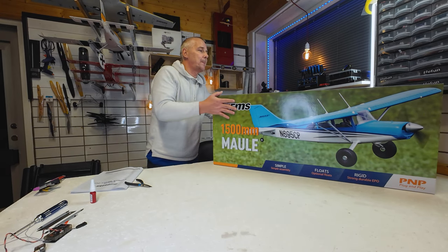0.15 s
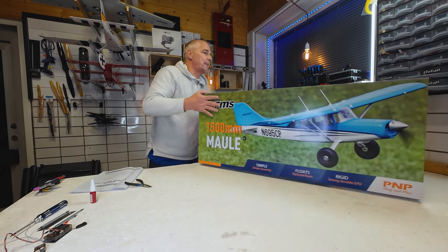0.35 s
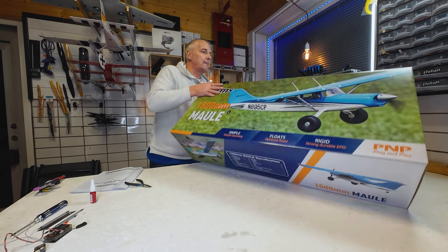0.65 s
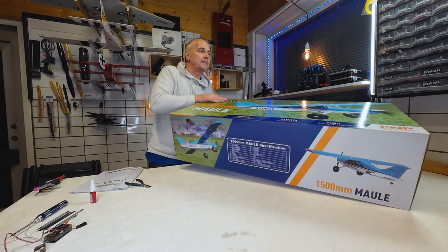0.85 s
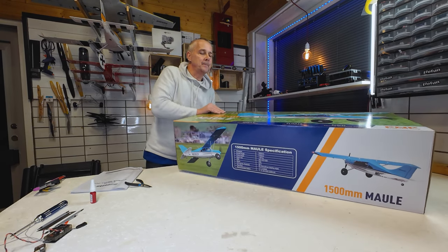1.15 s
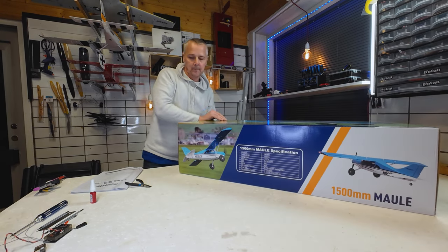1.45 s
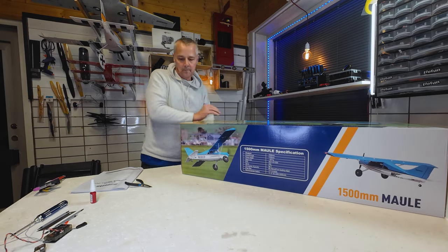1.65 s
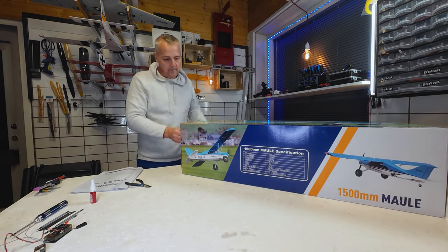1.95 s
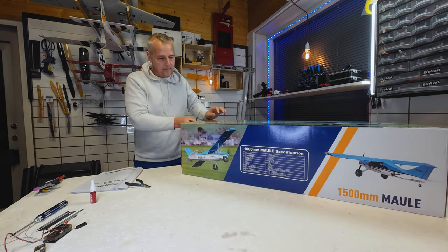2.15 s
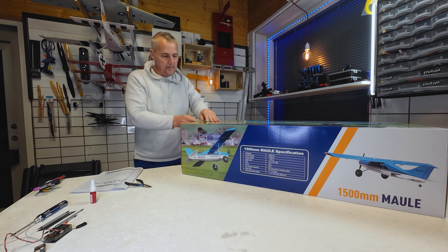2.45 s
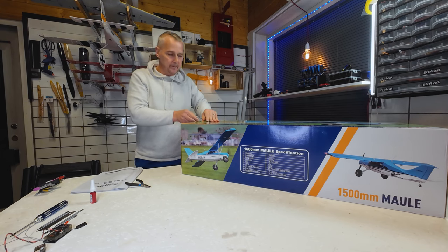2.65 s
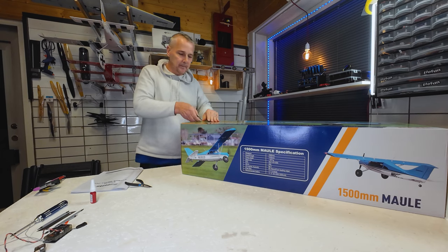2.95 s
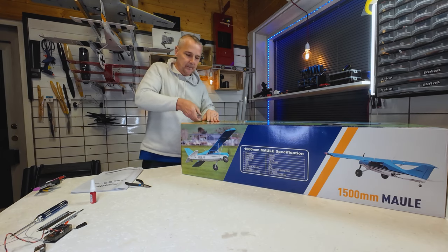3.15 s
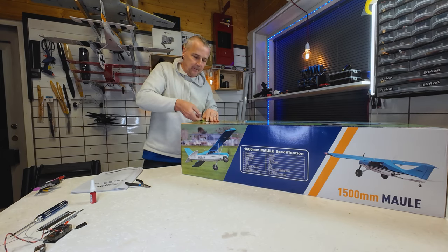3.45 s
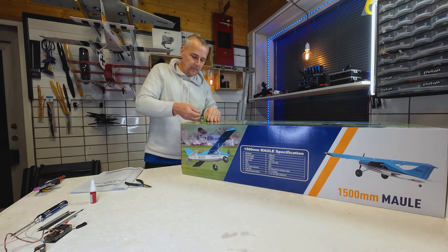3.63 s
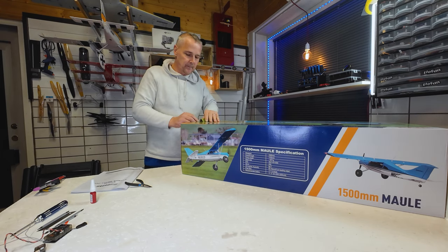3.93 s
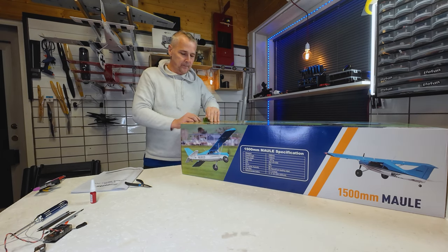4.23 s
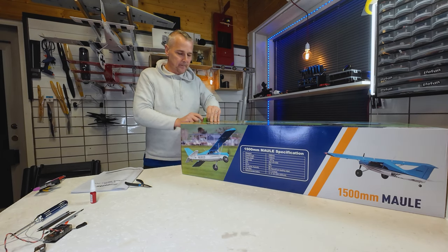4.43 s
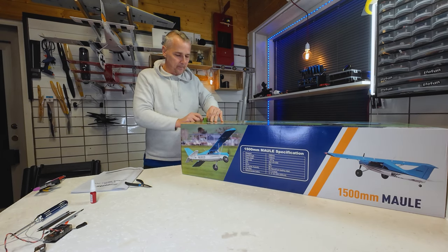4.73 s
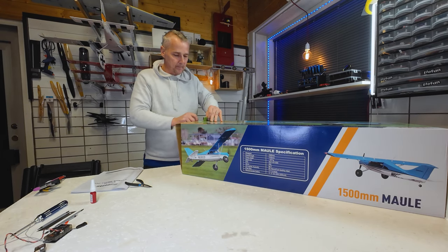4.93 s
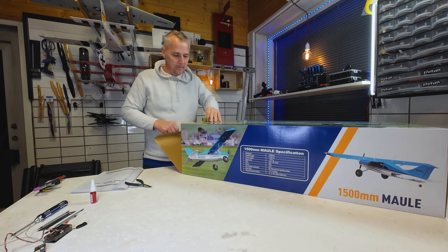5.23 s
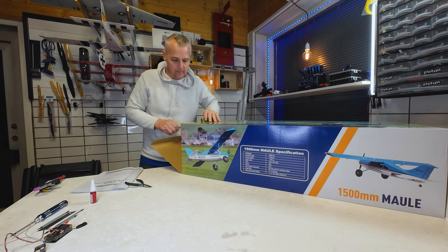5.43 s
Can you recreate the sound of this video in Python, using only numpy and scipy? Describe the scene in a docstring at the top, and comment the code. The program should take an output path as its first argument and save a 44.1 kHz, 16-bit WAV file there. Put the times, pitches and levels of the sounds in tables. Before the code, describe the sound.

A large, hollow cardboard box is handled on a bench in a small workshop, heard close in stereo with short dense echoes and faint low room noise. A dull low thump opens the scene. At about 0.4 s a brief rising squeak leads into a loud, gritty scrape, which judders in low bumps until about 0.8 s. Light knocks and faint sliding follow, with small crackles near 1.3 s. At 1.45 s the box drops flat with a huge, deep boom, the loudest event, ringing briefly. From 2.1 s fingers tap and pick softly at the board. A rub from 3.4 s ends in a crisp, hard pop at 3.6 s. Quiet ticks continue around 3.9 to 4.2 s; a short low groan and cracks come at 4.45 to 4.7 s, strongest at the end. Dry, raspy rubbing peaks at 5 s, then weaker scuffs at 5.25 and 5.5 s.

```python
"""A long cardboard box is tipped over on a workbench, dragged round and dropped flat: decaying sines give
its panel flexes, low resonances its hollow air, and random grains its friction and breaking fibres.
Fingers then pick at the end flap, which ticks, pops free, groans by stick-slip and rubs open.
A small workshop answers with dense decaying echoes over a quiet noise, heard by two close microphones."""
import sys
import numpy as np
from scipy import signal
from scipy.fft import rfft, irfft
from scipy.io import wavfile
from scipy.ndimage import uniform_filter1d, minimum_filter1d

SR = 44100
rng = np.random.default_rng(int(sys.argv[2]) if len(sys.argv) > 2 else 0)


def materialize(psi):
    """Save the field psi as 16-bit PCM at rate SR to the path in sys.argv[1].

    A 1-D psi becomes a single channel; in a 2-D psi each row is a channel.
    """
    bounded = np.clip(np.atleast_2d(psi).T, -1, 1)
    quanta = np.round(bounded * 32767).astype(np.int16)
    wavfile.write(sys.argv[1], SR, quanta)


N = 246078
TIME = np.arange(N) / SR
FREQS = np.fft.rfftfreq(N, 1 / SR)

# Steady room noise. Each row: frequency in Hz, relative spectrum level in dB.
QUIET_COLOUR = [(30, 7), (100, -4.5), (160, -16.5), (400, -23.5), (1000, -30), (3000, -31.5), (7000, -42),
                (15000, -40)]
QUIET_DB = -56
# Slow sway of the long panels. Each row: time in seconds, level in dB.
SWAY_LEVELS = [(0, -27), (0.2, -32), (1.7, -43), (2.1, -52), (3.55, -54.5), (3.7, -34), (5.2, -54.5)]
SWAY_HZ = 17

# Heavy blows and soft pushes that flex a panel. Each row: start in seconds, peak in dB, flex rate in Hz,
# swell time in seconds.
PANEL_FLEXES = [(0.011, -16, 166, 0.0031), (0.028, -7, 223, 0.0063), (0.058, -15.5, 86.5, 0.0075),
                (1.429, -15.5, 73, 0.0038), (1.455, -0.5, 39.4, 0.016), (1.467, -3, 113, 0.0042),
                (1.497, -9, 88, 0.0045), (1.571, -26.5, 85.2, 0.014), (1.699, -44, 91.3, 0.036),
                (2.082, -31, 122.6, 0.016), (2.487, -46, 97.5, 0.019), (2.726, -31.5, 237, 0.011),
                (2.755, -38.5, 89.8, 0.027), (3.305, -54, 100, 0.058), (3.594, -28, 110, .0089),
                (3.641, -30, 81, 0.0091), (4.15, -53.5, 101, 0.018), (4.746, -35, 100, .015),
                (5.037, -33, 94, 0.019), (5.278, -43, 100.3, 0.044)]
# The scraping box judders in a row of bumps that swell, fade and sink in pitch.
JUDDER_START_S, JUDDER_GAP_S, JUDDER_SWELL_S = 0.492, 0.057, 0.0065
JUDDER_DB, JUDDER_PEAK_S, JUDDER_WIDTH_S = -17.5, 0.61, 0.12
JUDDER_HZ, JUDDER_SAG_HZ_PER_S, JUDDER_SCATTER = 128, 180, 0.06
# Air in the box and its big panels. Each row: frequency in Hz, level in dB, 60 dB decay time in seconds.
BOX_RESONANCES = [(42, 2, .25), (86, 3.5, 0.33), (102, -2.5, .48), (140, -16, .34)]

# Decay of the workshop echoes. Each row: frequency in Hz, 60 dB decay time in seconds.
ROOM_DECAY = [(100, 0.18), (400, 0.28), (2800, 0.33), (6000, 0.26), (13000, 0.2)]
# Left-right correlation of echoes and room noise. Each row: frequency in Hz, correlation from 0 to 1.
STEREO_LIKENESS = [(60, 1), (160, 0.97), (500, 0.97), (1500, 0.94), (4000, 1), (8000, 0.05), (14000, 0.021)]
# Spectrum of the echoes. Each row: frequency in Hz, gain in dB.
ECHO_COLOUR = [(3000, 0.0024), (12000, -3)]

# Box sliding on the bench. Each row: time in seconds, stroke level in dB, brightness in dB per weight.
SLIDE_MOTION = [(0.019, -53.5, -5), (0.15, -49.5, 3.9), (0.32, -46, 2.5), (0.4, -35, 1.5),
                (0.452, -16.5, 2.5), (0.49, -22, 3.5), (0.54, -19, -3.5), (0.61, -27.5, -7),
                (0.662, -32, 3.6), (0.754, -37.5, 1.5), (0.815, -58.5, -1), (0.96, -58, 6),
                (1.02, -55.5, -2), (1.1, -48, 0.8), (1.39, -52, 0.4), (1.45, -39.5, -1.9),
                (1.639, -52.5, -1.5), (1.831, -68, 4.5)]
# The sliding edge rings higher as it gets brighter.
SLIDE_RING_HZ, SLIDE_RING_OCTAVES_PER_TILT = 2700, 0.21
# Spectrum of the dragging grains. Each row: frequency in Hz, relative level in dB.
DRAG_SPECTRUM = [(59, -28), (100, -6.5), (193, -8.5), (289, -9), (442, -12.5), (736, -16), (1330, -21),
                 (1580, -20.5), (3620, -21.5), (6200, -28.5), (8500, -29.5), (13500, -33), (16000, -40.5)]
# Body, rasp and hiss of the slide. Each row: brightness weight relative to the rasp, level at a
# moderate stroke in dB, rise in dB per dB of stroke.
SLIDE_LAYERS = [(-1, -41.5, .55), (0, -45, 1), (1, -50, 0.9638)]
# Limits of the body, rasp and hiss bands, in Hz.
FRICTION_EDGES = [85, 700, 5500, 16500]
# Panel rumble under friction: level at a moderate stroke in dB, rise in dB per dB of stroke; band in Hz.
SLIDE_RUMBLE, RUB_RUMBLE, RUMBLE_HZ = (-56.5, 1), (-52, 1), (82, 135)
MODERATE_DB = -45

# Knocks, pops and ticks of the board. Each row: time in seconds, strength in dB, brightness in dB
# per weight, crumpling time in seconds, ring in Hz.
BOARD_SNAPS = [(0.032, -34.5, -2.5, 0.0085, 2480), (0.466, -38, -2.5, 0.0048, 2400),
               (0.525, -39, -11, 0.011, 3500), (0.88, -52, -4.5, 0.0097, 2600),
               (0.917, -47.5, -4, 0.0023, 2740), (1.024, -44.5, -9.5, 0.0068, 3200),
               (1.274, -41, -2, 0.028, 2630), (1.306, -42.5, -1, 0.01, 2400), (1.427, -34, -3, 0.01, 1760),
               (1.462, -36.5, -11.5, 0.0083, 1750), (1.924, -74, -1.5, 0.0013, 2590),
               (2.081, -43.5, -4, 0.015, 2900), (2.105, -46.5, -3, 0.019, 2910),
               (2.468, -55.5, -2.5, 0.007, 2850), (2.596, -51.5, -5, 0.0096, 2880),
               (2.725, -45.5, -2, 0.011, 2860), (2.773, -47.5, -5, 0.016, 2500),
               (3.07, -65, -3, 0.0067, 2790), (3.125, -72.5, -0.5, .0016, 2800),
               (3.235, -57, -3, 0.0075, 2820), (3.293, -46, 0, 0.0035, 1500),
               (3.301, -43.5, 2.17, 0.0021, 1900), (3.416, -63.5, 2, .0069, 2400),
               (3.568, -26, -1.73, 0.011, 2800), (3.58, -29.5, -0.5, 0.0024, 2800),
               (3.603, -28, -1.5, 0.0031, 2850), (3.884, -61.5, -3, 0.0052, 2950),
               (3.946, -48, -4, 0.009, 2880), (4.019, -52.5, 0.63, 0.0084, 2780),
               (4.114, -50.5, 3.5, 0.0029, 5100), (4.151, -43.5, 1.3, 0.0041, 1570),
               (4.425, -53.5, -6, 0.0036, 3400), (4.442, -49, -5.5, 0.0083, 3520),
               (4.576, -38.5, -5.5, 0.0041, 3300), (4.646, -43, -8, 0.0047, 2700),
               (4.715, -31.5, -4, 0.0055, 2220), (4.993, -47, 1.5, 0.0089, 3860),
               (5.011, -45.5, -2, .0057, 3800), (5.226, -55, -2.4, .005, 3500),
               (5.245, -58, -3.5, 0.018, 2075), (5.505, -43.5, -0.53, 0.021, 1618)]
# Hollow, knock, crack and tick of a snap. Each row: brightness weight, level at a moderate snap in dB,
# rise in dB per dB of snap.
SNAP_LAYERS = [(-0.86, -46.5, 0.97), (1, -43, 1.0961), (3.19, -43, 1.1249), (4.5, -45, 0.93)]
# Limits of the hollow, knock, crack and tick bands, in Hz.
SNAP_LIMITS = [130, 350, 1200, 5000, 16500]
# Resonances of the board. Each row: frequency in Hz, width in Hz, level in dB.
BOARD_RESONANCES = [(305, 76, -2), (495, 140, 2.5), (746, 100, -1.5), (933, 30, -22.5), (1621, 330, -9),
                    (2320, 550, -10), (2480, 1200, 3.5), (3400, 150, -9.5), (5800, 300, -37.5)]
BRITTLENESS = 4
BOX_LANDED_S = 1.85  # earlier snaps belong to the box, later ones to the fingers

# Stick-slip of an edge on the bench. Each row: time in seconds, pitch in Hz, level in dB.
SQUEAK_PATH = [(0.395, 612, -40.5), (0.412, 700.3, -32.5), (0.44, 751, -21.5), (0.468, 912, -25),
               (0.5, 850, -35.5)]
SQUEAK_HARMONICS_DB = [2.5, -21.5, -1.5, -14.5, -11]  # from the fundamental up
# The flap groaning in its slot. Each row: time in seconds, pitch in Hz, level in dB.
GROAN_PATH = [(4.445, 320, -55), (4.47, 295.2, -46), (4.52, 252.7, -47), (4.565, 270.8, -64),
              (4.58, 304.2, -32.5), (4.62, 280, -37), (4.65, 289.7, -34.5), (4.68, 412, -37),
              (4.715, 400, -38)]
GROAN_HARMONICS_DB = [-1.5, -11, -19.5, -43]  # from the fundamental up

# Strokes of fingers and flap on the board. Each row: start in seconds, swell in seconds, release in
# seconds, stroke level in dB, brightness in dB per weight, ring in Hz.
RUB_STROKES = [(2.373, 0.038, 0.07, -58.5, 2, 2900), (2.584, 0.024, 0.066, -58, -2.5, 2900),
               (3.4, 0.076, 0.022, -36.5, 1, 2850), (3.83, 0.074, 0.098, -71, -4.5, 3500),
               (3.94, 0.11, 0.02, -59.5, -1.5, 3500), (4.249, 0.07, 0.037, -57, -1, 2900),
               (4.44, 0.054, 0.013, -50, -1, 3900), (4.55, .14, 0.018, -51.5, -3, 2300),
               (4.862, 0.025, 0.046, -40, 1.5, 2500), (4.933, 0.073, 0.0083, -32.5, 1, 3900),
               (5.208, 0.064, 0.035, -48, 0, 2300), (5.453, 0.065, 0.049, -44.5, -0.5, 1700)]
RUB_SWELL_POWER = 0.94
# Spectrum of the rubbing grains. Each row: frequency in Hz, relative level in dB.
RUB_SPECTRUM = [(100, 4), (300, 6.5), (700, 7), (1200, -4.5), (1700, -0.5), (3900, -4), (7000, -13),
                (14000, -14.5)]
# Body, rasp and hiss of a rub. Each row: brightness weight relative to the rasp, level at a
# moderate stroke in dB, rise in dB per dB of stroke.
RUB_LAYERS = [(-4.5, -52, 0.66), (-0.5, -46.5, 1), (1, -54.5, .8)]

# Response of the microphones and their ports. Each row: frequency in Hz, gain in dB.
MICROPHONE_RESPONSE = [(4500, -3.0), (6200, -3), (7200, -6), (10000, -0.5), (12200, -5.0),
                       (13500, 5.5), (16000, -1.5)]
EDGE_HZ = 16000


def gain_of(db):
    """Logarithmic level: decibels become an amplitude ratio."""
    return 10 ** (np.asarray(db) / 20)


def evened(x):
    """Power normalisation: the signal is scaled to an rms of one."""
    return x / np.sqrt(np.mean(x ** 2) + 1e-20)


def read(points, hz):
    """Interpolation on a logarithmic frequency axis."""
    table_hz, value = np.transpose(points)
    return np.interp(np.log(hz + 1), np.log(table_hz + 1), value)


def add(mix, s, sound):
    """Superposition: a sound is summed into the mix at time s."""
    part = mix[max(round(s * SR), 0):][:len(sound)]
    part += sound[:len(part)]


def band(x, lo, hi):
    """Causal band-pass filtering between two limits in Hz."""
    sections = signal.butter(N=3, Wn=[lo, hi], btype="band", fs=SR, output="sos")
    return signal.sosfilt(sections, x)


def resonance(x, hz, q):
    """Simple resonator: a peak filter rings longer the higher its quality factor."""
    return signal.lfilter(*signal.iirpeak(hz, q, fs=SR), x)


def coloured(x, points):
    """Linear filtering: the spectrum is multiplied by a gain curve in dB."""
    return irfft(rfft(x) * gain_of(read(points, FREQS)), N)


def wander(rate_hz):
    """Low-passed Gaussian noise: a smooth random course of rms one, up to about the given rate."""
    smooth = np.exp(-(FREQS / rate_hz) ** 2)
    return evened(irfft(rfft(rng.standard_normal(N)) * smooth, N))


def paired(a, b):
    """Spatial coherence: two unrelated signals become a pair alike at low and apart at high frequencies."""
    same = np.clip(read(STEREO_LIKENESS, FREQS), -1, 1)
    right = irfft(same * rfft(a) + np.sqrt(1 - same ** 2) * rfft(b), N)
    return np.array([a, right])


def placed(x, lead_us, pan_db):
    """Time and level difference: a positive lead reaches the left first, a positive pan favours it."""
    turn = np.exp(1j * np.pi * FREQS * lead_us / 1e6)  # half the lead for each side
    left = irfft(rfft(x) * turn, N) * gain_of(pan_db / 2)
    right = irfft(rfft(x) / turn, N) * gain_of(-pan_db / 2)
    return np.array([left, right])


def room_noise():
    """Stationary noise: shaped Gaussian noise with partial coherence between the microphones."""
    pair = paired(*rng.standard_normal((2, N)))
    return gain_of(QUIET_DB) * evened(coloured(pair, QUIET_COLOUR))


def sway():
    """Infrasonic radiation: long panels wobble near the lower limit of hearing and pump the air."""
    turns = np.cumsum(SWAY_HZ * (1 + 0.2 * wander(8))) / SR
    return evened(np.sin(2 * np.pi * turns)) * gain_of(np.interp(TIME, *np.transpose(SWAY_LEVELS)))


def judder_bumps(count=6):
    """Repeated impact: evenly spaced bumps under a bell-shaped envelope, sinking in pitch."""
    rows = []
    for s in JUDDER_START_S + JUDDER_GAP_S * np.arange(count):
        db = JUDDER_DB - 20 / np.log(10) * ((s - JUDDER_PEAK_S) / JUDDER_WIDTH_S) ** 2
        hz = JUDDER_HZ - JUDDER_SAG_HZ_PER_S * (s - JUDDER_START_S)
        hz *= 1 + JUDDER_SCATTER * rng.uniform(-1, 1)
        rows.append((s, db, hz, JUDDER_SWELL_S))
    return rows


def panel_flexes():
    """Damped free vibration: a panel swings briefly after each blow or push and each judder bump."""
    out, t = np.zeros(N), np.arange(SR // 2) / SR
    for s, db, hz, swell in list(PANEL_FLEXES) + judder_bumps():
        u = t / max(swell, 0.002)
        envelope = (u * np.exp(1 - u)) ** 2  # reaches one at the swell time
        add(out, s, gain_of(db) * envelope * np.sin(2 * np.pi * hz * t))
    return out


def boom(x):
    """Modal resonance: the hollow box rings on in its lowest modes."""
    # ln 9 nearly equals the 2.2 that links quality factor to 60 dB decay time
    return sum(gain_of(db) * resonance(x, hz, hz * t60 / np.log(9)) for hz, db, t60 in BOX_RESONANCES)


def workshop(x, gap_s=0.00052):
    """Diffuse reverberation: dense reflections off bench, walls and shelves, longest in the mid range."""
    taps = rng.choice([-1., 1.], (2, N)) * (rng.random((2, N)) < 5000 / SR)  # 5000 per second
    hz, t, z = signal.stft(paired(*taps)[:, :SR // 2], SR, nperseg=256)
    fade_db = -60 * t / read(ROOM_DECAY, hz)[:, None]
    tail = signal.istft(z * gain_of(fade_db), SR, nperseg=256)[1]
    # the direct sound leads: the tail is silent for half the gap, full after one and a half
    tail *= np.clip(np.arange(tail.shape[1]) / SR / gap_s - 0.5, 0, 1)
    wet = signal.fftconvolve(x[None], tail / np.linalg.norm(tail[0]), axes=1)[:, :N]
    return coloured(wet, ECHO_COLOUR)


def sliding():
    """Kinematics of sliding: level, brightness and ring pitch of the box's edge on the bench."""
    s, db, tilt = np.transpose(SLIDE_MOTION)
    stroke_db = np.interp(TIME, s, db, left=-200, right=-200)
    tilt = np.interp(TIME, s, tilt)
    return stroke_db, tilt, SLIDE_RING_HZ * 2 ** (SLIDE_RING_OCTAVES_PER_TILT * tilt)


def contact(x, hz, width_hz=950, ring_db=1):
    """Time-varying resonance: the gripped patch adds a ring whose pitch follows hz."""
    turn = np.exp(2j * np.pi * np.cumsum(hz * np.ones(len(x))) / SR)
    r = np.exp(-np.pi * width_hz / SR)
    # shift the ring pitch to zero, low-pass, and shift back
    ring = 2 * (turn * signal.lfilter([1 - r], [1, -r], x / turn)).real
    return x + gain_of(ring_db) * ring


def patchy(x):
    """Local variation: each fresh spot of board favours other pitches for a few hundredths of a second."""
    z = signal.stft(x, nperseg=512)[2]
    over_pitch = uniform_filter1d(rng.standard_normal(z.shape), 3, 0)
    patches_db = 2.6 * evened(uniform_filter1d(over_pitch, 5, 1))
    return signal.istft(z * gain_of(patches_db), nperseg=512)[1][:N]


def fibre_forces(count, spread_db):
    """Random micro-impacts: Gaussian forces whose strengths are scattered exponentially in dB."""
    return rng.standard_normal(count) * gain_of(spread_db * np.minimum(rng.exponential(1, count), 4))


def friction(motion, colour, bands, grains_per_s, spread_db, clump_db, clump_hz, ring_db, level_db):
    """Granular friction: fibres catch and let go; force raises the rasp more than the body and hiss."""
    stroke_db, tilt, ring_hz = motion
    sizes = fibre_forces(N, spread_db)
    grains = sizes * (rng.random(N) < grains_per_s / SR)
    grains = grains * gain_of(clump_db * wander(clump_hz))
    grains = contact(patchy(coloured(grains, colour)), ring_hz, ring_db=ring_db)
    out = np.zeros(N)
    for (weight, db, follow), lo, hi in zip(bands, FRICTION_EDGES, FRICTION_EDGES[1:]):
        part_db = db + follow * (stroke_db - MODERATE_DB) + tilt * weight
        out += gain_of(part_db) * evened(band(grains, lo, hi))
    return gain_of(level_db) * out


def rumble(stroke_db, db, follow):
    """Forced vibration: uneven pressure shakes the panel under the stroke."""
    shaking = evened(band(rng.standard_normal(N), *RUMBLE_HZ))
    return shaking * gain_of(db + follow * (stroke_db - MODERATE_DB))


def board(x, direct_db):
    """Damped plate resonance: corrugated board rings beside the bare contact sound."""
    rings = sum(gain_of(db) * resonance(x, hz, hz / width) for hz, width, db in BOARD_RESONANCES)
    return rings + gain_of(direct_db) * x


def snaps(rows, level_db=-1.0, spread_db=4, direct_db=-7):
    """Brittle fracture: fibres strain, break, then crush in a fading spray that rings the board."""
    out, lead = np.zeros(N), SR // 50  # 20 ms of strain before the break
    t = np.arange(-lead, SR // 6) / SR
    strain = 0.25 * np.exp(-abs(t) / 0.005)
    for s, db, tilt, crumple, ring_hz in rows:
        # quick, bright snaps start with a brittle break, slow or dull ones hardly at all
        brittle = BRITTLENESS * gain_of(tilt) * np.exp(-abs(crumple) / 0.004 - abs(t) / 0.0007)
        crushing = brittle + np.exp(-abs(t / crumple))
        force = fibre_forces(len(t), spread_db) * np.where(t < 0, strain, crushing)
        sound = contact(board(force, direct_db), ring_hz)
        for (weight, band_db, follow), lo, hi in zip(SNAP_LAYERS, SNAP_LIMITS, SNAP_LIMITS[1:]):
            part = band(sound, lo, hi)
            part_db = level_db + band_db + follow * (db - MODERATE_DB) + tilt * weight
            # part_db is the rms that the band would have if spread over 20 ms
            add(out, s + t[0], gain_of(part_db) * np.sqrt(lead) * part / np.linalg.norm(part))
    return out


def stick_slip(rows, harmonics_db, jitter, jitter_hz):
    """Stick-slip oscillation: an edge grips and slips at an unsteady pitch and strength."""
    s, hz, db = np.transpose(rows)
    turns = np.cumsum(np.interp(TIME, s, hz) * (1 + jitter * wander(jitter_hz))) / SR
    tone = sum(gain_of(d) * np.sin(2 * np.pi * k * turns) for k, d in enumerate(harmonics_db, 1))
    flutter_db = 3 * wander(jitter_hz)
    return tone * gain_of(np.interp(TIME, s, db, left=-200, right=-200) + flutter_db)


def stroking():
    """Power summation: strokes swell and let go; the strongest dominates brightness and ring pitch."""
    start, swell, release, db, tilt, ring_hz = np.transpose(RUB_STROKES)[:, :, None]
    age = np.maximum(TIME - start, 0)
    rise = np.minimum(age / swell, 1) ** RUB_SWELL_POWER
    fall = np.exp(-np.clip((age - swell) / release, 0, 20))
    power = (gain_of(db) * rise * fall) ** 2 + 1e-20
    share = power / power.sum(0)
    return 10 * np.log10(power.sum(0)), (share * tilt).sum(0), (share * ring_hz).sum(0)


def scene():
    """Superposition of sources: box contacts reach the right first, hands the left; each stirs the air."""
    flexes, slide, strokes = panel_flexes(), sliding(), stroking()
    knocks = snaps([row for row in BOARD_SNAPS if row[0] < BOX_LANDED_S])
    picks = snaps([row for row in BOARD_SNAPS if row[0] >= BOX_LANDED_S])

    drag = friction(slide, DRAG_SPECTRUM, SLIDE_LAYERS, grains_per_s=9000, spread_db=2.0,
                    clump_db=0.0, clump_hz=88, ring_db=-4.5, level_db=-1.5)
    drag += stick_slip(SQUEAK_PATH, SQUEAK_HARMONICS_DB, jitter=0.022, jitter_hz=242)
    rubs = friction(strokes, RUB_SPECTRUM, RUB_LAYERS, grains_per_s=3000, spread_db=1.0,
                    clump_db=4.0, clump_hz=69, ring_db=8.5, level_db=-1.5)
    rubs += stick_slip(GROAN_PATH, GROAN_HARMONICS_DB, jitter=0.041, jitter_hz=89.5)
    direct = placed(drag + knocks, lead_us=-26, pan_db=0.1)
    direct += placed(rubs + picks, lead_us=18, pan_db=-0.3)

    box_boom = boom(gain_of(1.5) * flexes + gain_of(4) * knocks)
    hand_boom = boom(gain_of(-0.5) * (picks + rubs)) + rumble(strokes[0], *RUB_RUMBLE)
    bass = flexes + rumble(slide[0], *SLIDE_RUMBLE) + placed(sway(), lead_us=0, pan_db=6.0)
    bass += placed(box_boom, lead_us=0, pan_db=2.5) + placed(hand_boom, lead_us=0, pan_db=-15)

    # each place in the room has echoes of its own
    echoes = workshop(gain_of(-10.0) * drag + gain_of(0.5) * knocks + gain_of(-8.5) * flexes)
    echoes += workshop(gain_of(-3.5) * rubs) + workshop(picks)
    return direct + bass + echoes + room_noise()


def record(dry):
    """Transduction: microphone ports colour the sound, a limiter holds its peaks, a low-pass ends it."""
    heard = coloured(dry, MICROPHONE_RESPONSE)
    allowed = 0.95 / np.maximum(abs(heard).max(axis=0), 0.95)
    # hold the lowest gain over 900 samples, then smooth it
    heard = heard * uniform_filter1d(minimum_filter1d(allowed, size=900), size=900)
    low_pass = signal.firwin(401, EDGE_HZ, window=("kaiser", 9), fs=SR)
    return signal.oaconvolve(heard, low_pass[None], "same")


dry = scene()
out = record(dry)
materialize(out)
```